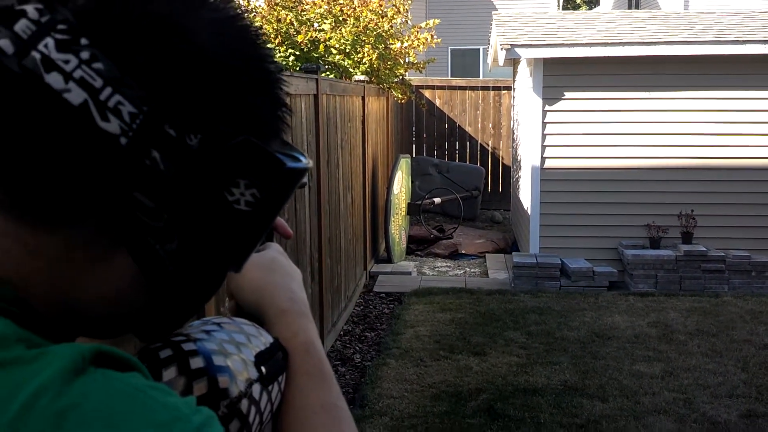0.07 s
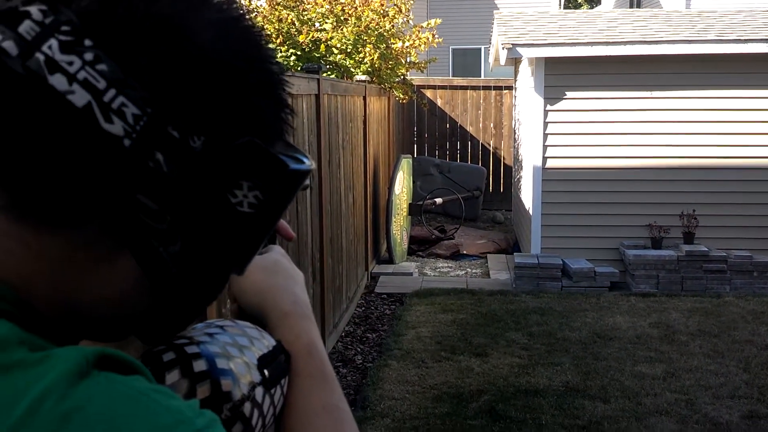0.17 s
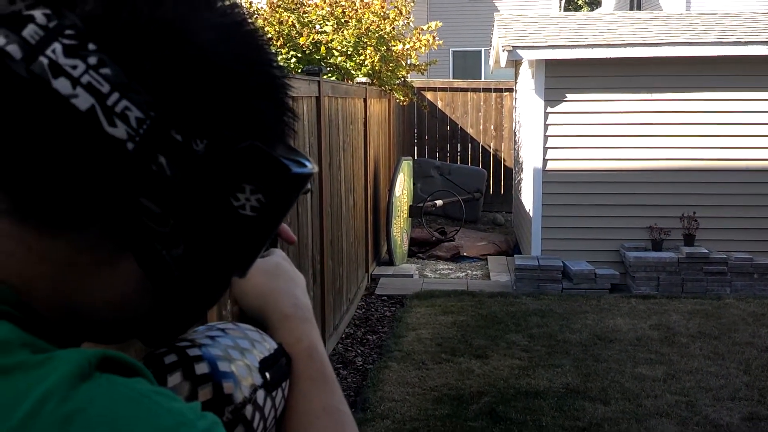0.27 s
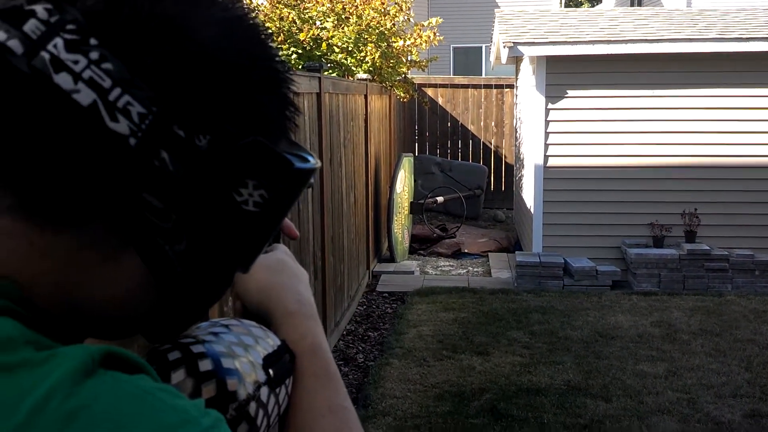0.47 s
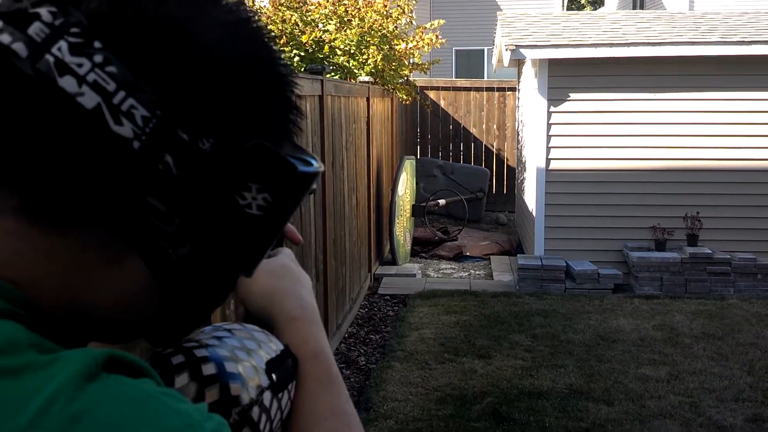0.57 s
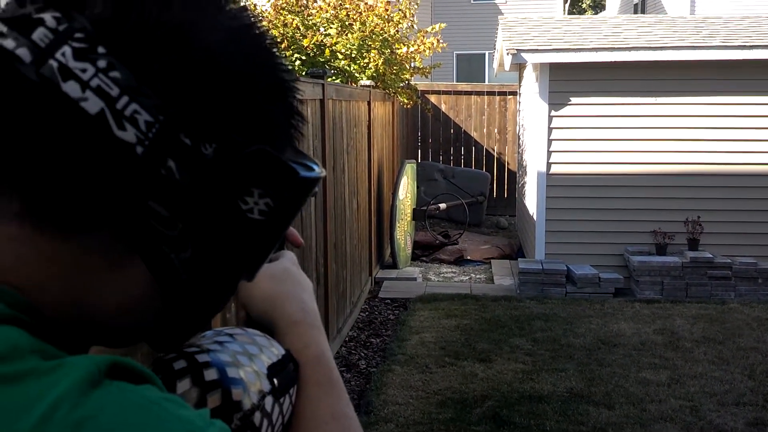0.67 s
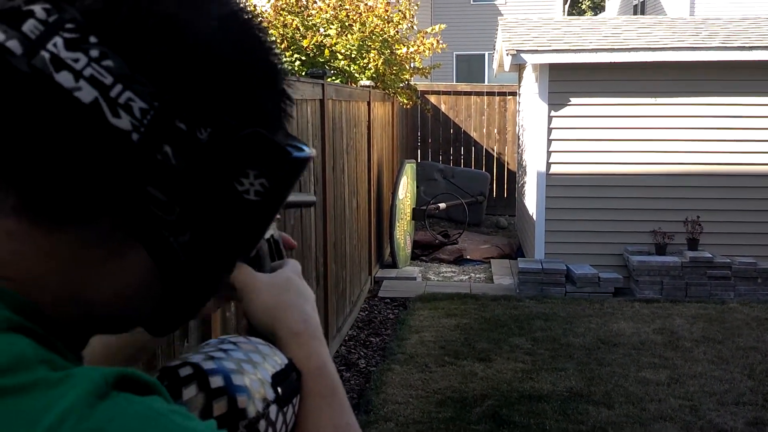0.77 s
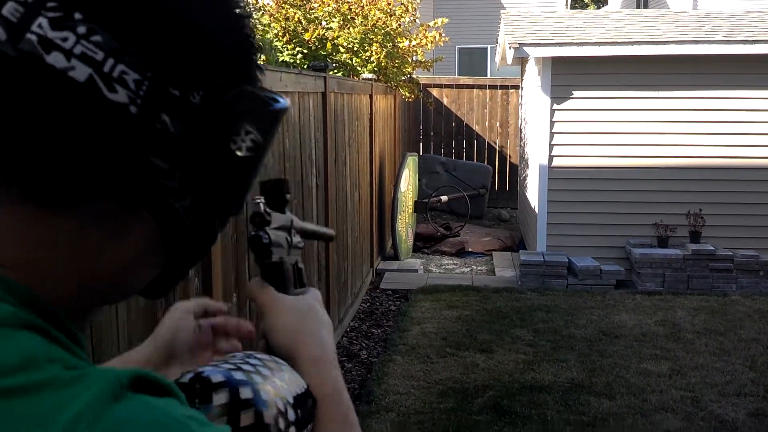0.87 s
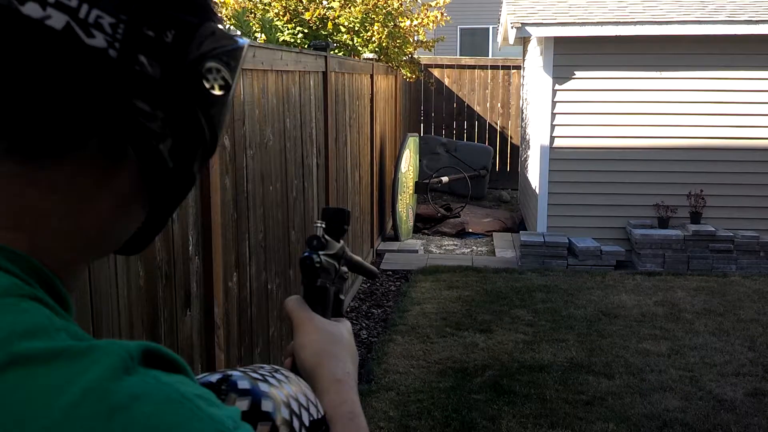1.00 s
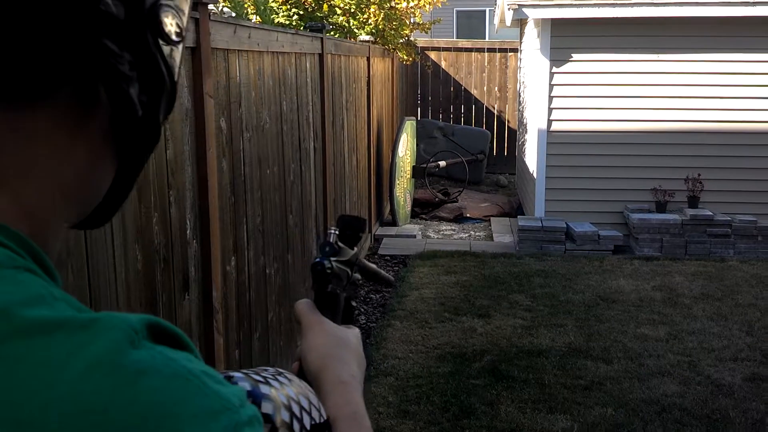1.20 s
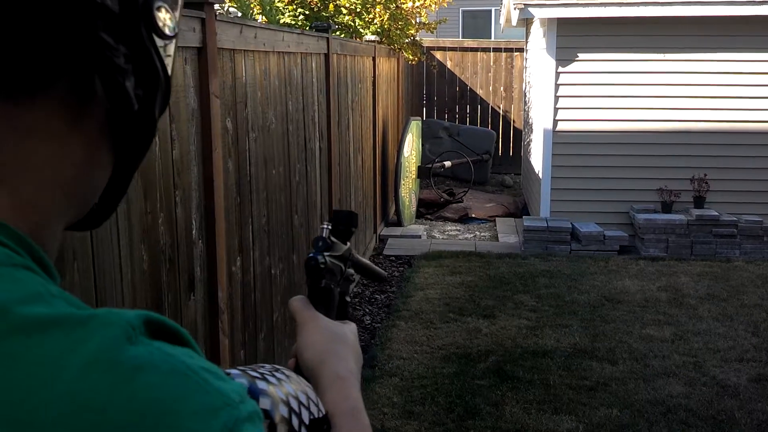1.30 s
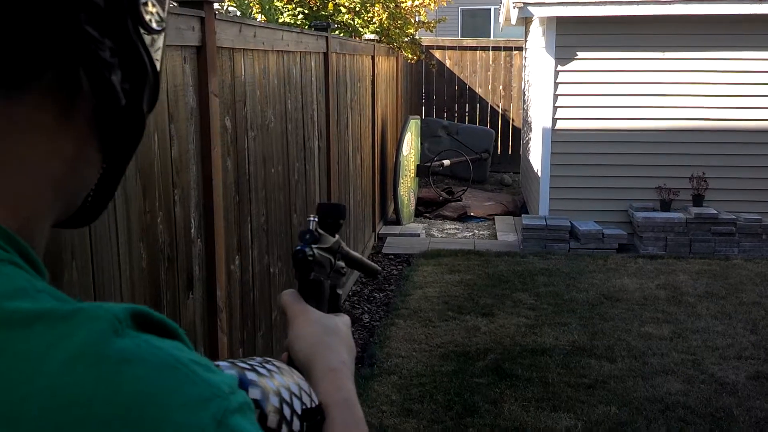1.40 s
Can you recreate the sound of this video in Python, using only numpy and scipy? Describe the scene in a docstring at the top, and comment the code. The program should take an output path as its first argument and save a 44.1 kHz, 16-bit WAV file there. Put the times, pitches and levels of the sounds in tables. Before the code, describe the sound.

A paintball gun fires one sharp pop in a fenced backyard, heard from just behind the shooter. Wind briefly buffets the microphone beforehand. The ball then smacks a hollow target that rings briefly, leaving faint outdoor noise.

```python
"""One paintball shot in a fenced backyard, heard from just behind the shooter.
Wind buffets the microphone over outdoor noise, hiss and the odd faint tick. The action clicks and
a blast of gas pops from the barrel. A fifth of a second later the ball smacks a hollow target that
rings. Fence and shed throw each sound back. Afterwards the background is much quieter."""
import sys
import numpy as np
from scipy import signal
from scipy.fft import rfft, irfft
from scipy.io import wavfile

SR = 44100
rng = np.random.default_rng(int(sys.argv[2]) if len(sys.argv) > 2 else 0)


def pcm_store(signal):
    """Save signal as 16-bit PCM."""
    levels = np.round(np.clip(np.atleast_2d(signal), -1, 1) * 32767)
    wavfile.write(sys.argv[1], SR, levels.astype(np.int16).T)


N = 63945
T = np.arange(N) / SR
FFT_SIZE = 2 ** 17
HZ = np.maximum(np.arange(FFT_SIZE // 2 + 1) * SR / FFT_SIZE, 1)
PORT_LAG_S = .000408  # between the two microphone ports


def from_db(db):
    """Decibels to gain."""
    return 10 ** (np.asarray(db) / 20)


def db_at_hz(points):
    """(freq_hz, gain_db) rows interpolated over HZ on a log axis."""
    freq_hz, gain_db = np.transpose(points)
    return np.interp(np.log(HZ), np.log(freq_hz), gain_db)


def envelope(points):
    """Gain over time from (time_s, level_db) rows."""
    return from_db(np.interp(T, *np.transpose(points)))


def min_phase(x, gain):
    """Causal filter with the given gain per frequency."""
    cepstrum = irfft(np.log(gain))
    cepstrum[1:FFT_SIZE // 2] *= 2
    cepstrum[FFT_SIZE // 2 + 1:] = 0
    return irfft(rfft(x, FFT_SIZE) * np.exp(rfft(cepstrum)))[..., :N]


def colour(x, spectrum):
    """Give white sound a spectrum at equal power."""
    gain = from_db(db_at_hz(spectrum))
    return min_phase(x, gain / np.sqrt(np.mean(gain ** 2)))


def pulse(start_s):
    """Unit impulse."""
    return 1.0 * (np.arange(N) == int(start_s * SR))


def delayed(x, delay_s):
    """Pure delay."""
    return np.roll(x, int(delay_s * SR), axis=-1) * (T >= delay_s)


def burst(start_s, hold_s, t60_s, side_gain):
    """Stereo noise: instant onset, hold, decay."""
    mid, side = rng.standard_normal((2, N))
    decay = from_db(-60 * np.maximum(T - start_s - hold_s, 0) / t60_s)
    return (mid + side_gain * side * [[1], [-1]]) * (T >= start_s) * decay


def ring(start_s, modes):
    """Struck modes: decaying sines of alternating sign."""
    t = np.maximum(T - start_s, 0)
    return sum((-1) ** k * from_db(db - 60 * t / t60_s) * np.sin(2 * np.pi * hz * t)
               for k, (hz, db, t60_s) in enumerate(modes))


# wind rumble: time_s, level_db
RUMBLE_LEVEL = [(0, -18.5), (.03, -29), (.075, -34), (.1, -31), (.125, -40), (.17, -47), (.2, -27),
                (.245, -40), (.27, -30), (.305, -36.5), (.335, -44), (.45, -65), (.85, -71), (1.1, -68),
                (1.45, -76)]
# rumble spectrum: freq_hz, gain_db
RUMBLE_SPECTRUM = [(25, -25), (55, -13), (80, -5), (103, 3.5), (132, -6.5), (162, 1), (200, -7.5),
                   (270, -12.5), (400, -23.5), (800, -48), (3000, -78)]
# buffets: start_s, level_db, pitch_hz
WIND_BUFFETS = [(0.0591, -15, 105), (0.193, -31, 110), (0.2056, -3, 257.5), (0.2114, -9, 111),
                (0.2666, -6, 187), (0.2825, -14, 120), (0.299, -19, 105)]


def wind(rise_cycles=.45, t60_cycles=6.8):
    """Rumble and short buffets on the right port; the left gets them inverted and late."""
    air = envelope(RUMBLE_LEVEL) * colour(rng.standard_normal(N), RUMBLE_SPECTRUM)
    for start_s, level_db, pitch_hz in WIND_BUFFETS:
        cycles = np.maximum(T - start_s, 0) * pitch_hz
        rise = 1 - np.exp(-cycles / rise_cycles)
        decay = from_db(level_db - 60 * cycles / t60_cycles)
        air += rise * decay * np.sin(2 * np.pi * cycles)
    return np.array([-delayed(air, PORT_LAG_S), air])


# outdoor noise: time_s, level_db
OUTDOOR_LEVEL = [(0, -43), (.32, -44.5), (.38, -56), (.52, -63.5), (.7, -54.5), (.95, -62), (1.2, -64.5),
                 (1.33, -61.5), (1.38, -59), (1.45, -61)]
# outdoor spectrum: freq_hz, gain_db
OUTDOOR_SPECTRUM = [(30, -26), (65, -15.5), (100, 8.5), (135, 1), (190, -3), (265, 7.5), (320, -0.5),
                    (390, 2), (600, -9.5), (900, 1), (1300, -8.5), (1900, -10.5), (2800, -24),
                    (4500, -26.5), (8000, -46.5), (15000, -42)]
# hiss: time_s, level_db
HISS_LEVEL = [(0, -59.5), (.32, -60.5), (.45, -70.5), (.8, -74), (1.45, -74.5)]
# hiss spectrum: freq_hz, gain_db
HISS_SPECTRUM = [(100, -8.5), (3000, 3.5), (5500, -5.5), (8000, -5.5), (11000, -1), (15000, -1)]


def background():
    """Distant outdoor noise and hiss; both drop at the shot."""
    outdoors, hiss = rng.standard_normal((2, 2, N))
    return (envelope(OUTDOOR_LEVEL) * colour(outdoors, OUTDOOR_SPECTRUM)
            + envelope(HISS_LEVEL) * colour(hiss, HISS_SPECTRUM))


# high ticks: start_s, level_db
FAINT_TICKS = [(0.11, -57), (0.421, -41), (.798, -69), (1.156, -71)]
# sizzle: time_s, level_db
SIZZLE_LEVEL = [(.88, -97), (.95, -73), (1.05, -73.5), (1.18, -84), (1.3, -101)]
# tick and sizzle spectrum: freq_hz, gain_db
TICK_SPECTRUM = [(1000, -5), (6000, -11), (7900, -5.5), (9500, -19.5), (15000, -18.5)]


def ticks():
    """Faint, thin ticks and a short, late sizzle."""
    clicks = sum(from_db(level_db) * burst(start_s, hold_s=.002, t60_s=.022, side_gain=1.0)
                 for start_s, level_db in FAINT_TICKS)
    sizzle = envelope(SIZZLE_LEVEL) * rng.standard_normal((2, N))
    return colour(clicks + sizzle, TICK_SPECTRUM)


# contacts in the gun's action: start_s, level_db
CONTACTS = [(.3360, -17.5), (.3380, -18.5)]
# contact spectrum: freq_hz, gain_db
CONTACT_SPECTRUM = [(100, -19.5), (550, -8.5), (1000, 4), (1400, -4.5), (2000, -1), (2900, -6),
                    (3400, -4.5), (3900, -3), (4800, -11.5), (5800, -2.5), (6700, -9), (8200, 4.5),
                    (9300, -6), (10500, -19.5), (15500, -16)]
# action's metal: freq_hz, level_db, t60_s
METAL_MODES = [(1030, -48, .04), (2900, -33.5, .03), (3290, -36, .03), (7650, -34.5, .02),
               (8200, -32, .025), (8630, -35, .02)]


def action():
    """Two sharp metal contacts just before the gas is released."""
    first_s = CONTACTS[0][0]
    contacts = 0
    for start_s, level_db in CONTACTS:
        noise = burst(start_s, hold_s=.0003, t60_s=.0051, side_gain=.8)
        contacts += from_db(level_db) * (from_db(3) * pulse(start_s) + noise)
    direct = colour(contacts, CONTACT_SPECTRUM) + ring(first_s, METAL_MODES)
    tail = yard(first_s, CONTACT_SPECTRUM, near_db=-24.5, near_t60_s=.039, far_db=-46, build_s=.002)
    return direct + tail


# yard's far decay: freq_hz, t60_s
YARD_DECAY = [(100, 0.45), (350, 0.4), (1000, 0.48), (2000, 0.58), (4000, 0.47), (8000, .38), (15000, 0.14)]


def yard(start_s, spectrum, near_db, near_t60_s, far_db, build_s):
    """Scatter from fence boards, shed and houses: a quick near part, a far tail dying by band."""
    t = np.maximum(T - start_s, 0)
    white = rfft(rng.standard_normal((2, N)), FFT_SIZE)
    near = from_db(near_db - 60 * t / near_t60_s)
    centres_hz = np.array(YARD_DECAY)[:, 0]
    tail = 0
    for freq_hz, t60_s in YARD_DECAY:
        band_gain = np.interp(np.log(HZ), np.log(centres_hz), centres_hz == freq_hz)
        far = from_db(far_db - 60 * t / t60_s)
        tail += irfft(white * band_gain)[:, :N] * (near + far)
    build = 1 - np.exp(-(t / build_s) ** 2)
    return colour(tail * build, spectrum)


# gas blast: freq_hz, gain_db
GAS_SPECTRUM = [(40, -27), (110, -7), (200, -9.5), (330, 6.5), (520, -1), (750, 6.5), (950, 5.5),
                (1250, -3), (1850, 2), (2300, -9), (3300, -10), (4500, -16), (6000, -11), (8200, -9),
                (10000, -16), (13000, -23.5), (15500, -17.5)]
# barrel and body: freq_hz, level_db, t60_s
GUN_MODES = [(156, -26.5, 0.056), (330.6, -22.5, .07), (935, -30.5, 0.053), (1170, -36, 0.089),
             (1430, -31, 0.035), (1875, -40, .06)]
# off ground and fence: delay_s, gain_db
POP_ECHOES = [(.0064, -12.5), (0.0145, -16), (0.0175, -15.5)]
# scattered pop: freq_hz, gain_db
POP_TAIL_SPECTRUM = [(40, -33.5), (110, -12), (250, -1.5), (480, 3.5), (700, -5.5), (980, 5), (1300, -3.5),
                     (1850, -4.5), (2900, -10.5), (4300, -11), (6000, -13), (8000, -13.5), (10500, -17),
                     (15000, -19)]


def shot(start_s=.3549, level_db=-15.5):
    """A pressure front and milliseconds of rushing gas; the barrel rings along."""
    front = from_db(11.5) * pulse(start_s)
    gas = burst(start_s, hold_s=.007, t60_s=.03, side_gain=.74)
    direct = colour(from_db(level_db) * (front + gas), GAS_SPECTRUM) + ring(start_s, GUN_MODES)
    tail = yard(start_s, POP_TAIL_SPECTRUM, near_db=-23, near_t60_s=.14, far_db=-34.5, build_s=.008)
    return direct + echoes(direct, POP_ECHOES, cutoff_hz=11960) + tail


def echoes(x, paths, cutoff_hz):
    """Distinct, duller reflections."""
    lowpass = signal.butter(1, cutoff_hz, fs=SR, output="sos")
    dull = signal.sosfilt(lowpass, x + 1e-18)
    return sum(from_db(gain_db) * delayed(dull, delay_s) for delay_s, gain_db in paths)


# ball's smack: freq_hz, gain_db
SMACK_SPECTRUM = [(30, -54), (60, -39), (120, -19.5), (200, -7.5), (380, -2), (560, -15), (850, 4),
                  (1050, 2), (1280, -4), (1500, -2), (1950, 2.5), (2400, -3), (3000, -4.5), (4500, -18),
                  (6000, -14.5), (7800, -9), (10000, -23), (13000, -31), (15500, -24.5)]
# hollow target, one close pair beating: freq_hz, level_db, t60_s
PANEL_MODES = [(197, -42.5, 0.25), (292, -36, 0.19), (363, -34.5, 0.44), (371, -33.5, 0.45),
               (564, -46, 0.19), (693, -26.5, .07), (893.3, -17.5, 0.04), (961, -32.5, 0.23),
               (1112, -32, 0.072), (1740, -31.5, 0.16), (1830, -37, .11), (1960, -25.5, 0.052)]
# off shed and fence corner: delay_s, gain_db
SMACK_ECHOES = [(0.0109, -6), (0.015, -12), (.0197, -10.5)]
# scattered smack: freq_hz, gain_db
SMACK_TAIL_SPECTRUM = [(30, -38.5), (65, -21.5), (110, -3.5), (250, 2.5), (400, 2.5), (700, 0.5),
                       (1000, -2), (1300, -8), (1850, -4.5), (3000, -12.5), (4300, -21), (6000, -23.5),
                       (7900, -21.5), (10500, -28.5), (15000, -32.5)]


def hit(start_s=.5694, level_db=-16.5):
    """The ball bursts on the target, whose panel rings on."""
    impact = from_db(15.5) * pulse(start_s)
    splat = burst(start_s, hold_s=.0024, t60_s=.022, side_gain=.55)
    direct = colour(from_db(level_db) * (impact + splat), SMACK_SPECTRUM) + ring(start_s, PANEL_MODES)
    tail = yard(start_s, SMACK_TAIL_SPECTRUM, near_db=-26.5, near_t60_s=.18, far_db=-30.5, build_s=.013)
    return direct + echoes(direct, SMACK_ECHOES, cutoff_hz=2040) + tail


def notches(multiples, width_hz, floor=1e-3):
    """Gain of narrow cancellations at multiples of 1 / PORT_LAG_S."""
    offsets_hz = [HZ - k / PORT_LAG_S + 1e-6 for k in multiples]
    return np.prod([floor + 1 / (1 + (width_hz / hz) ** 2) ** 2 for hz in offsets_hz], axis=0)


# side over mid: freq_hz, gain_db
STEREO_WIDTH = [(60, 2.5), (130, -4.5), (220, -5), (380, -8), (520, -2), (800, -14.5), (1200, -7),
                (1700, -2), (2400, 3), (3500, -2.5), (5000, -1), (8000, -1), (15000, 2.5)]
# left over right: freq_hz, gain_db
PORT_BALANCE = [(100, -4.5), (350, 1), (700, 0), (2000, 0), (4000, 0), (5600, -9.5), (6800, 5.5),
                (8000, 15), (9300, 4.5), (11000, 1), (15000, -0.5)]


def microphone(x):
    """Two close ports: narrow midrange image, bright left port, notches in mid and side."""
    mid = (x[0] + x[1]) / 2
    side = min_phase((x[0] - x[1]) / 2, from_db(db_at_hz(STEREO_WIDTH)))
    lean = from_db(db_at_hz(PORT_BALANCE) / 2)
    left, right = min_phase(mid + side, lean), min_phase(mid - side, 1 / lean)
    mid = min_phase((left + right) / 2, notches((1, 2), width_hz=139))
    side = min_phase((left - right) / 2, notches((.5, 1.5), width_hz=150))
    return np.array([mid + side, mid - side])


def scene():
    """Wind on the microphone; click, pop and smack over the background."""
    return microphone(action() + shot() + hit() + ticks() + background()) + wind()


def record(dry, ceiling=.39, cutoff_hz=15900):
    """Soft clip, then a steep low-pass."""
    lowpass = signal.ellip(10, .2, 70, cutoff_hz, fs=SR, output="sos")
    return signal.sosfilt(lowpass, ceiling * np.tanh(dry / ceiling))


dry = scene()
out = record(dry)
pcm_store(out)
```